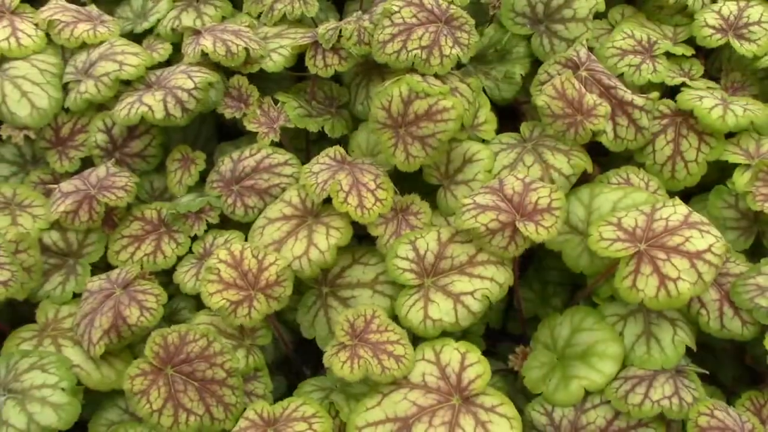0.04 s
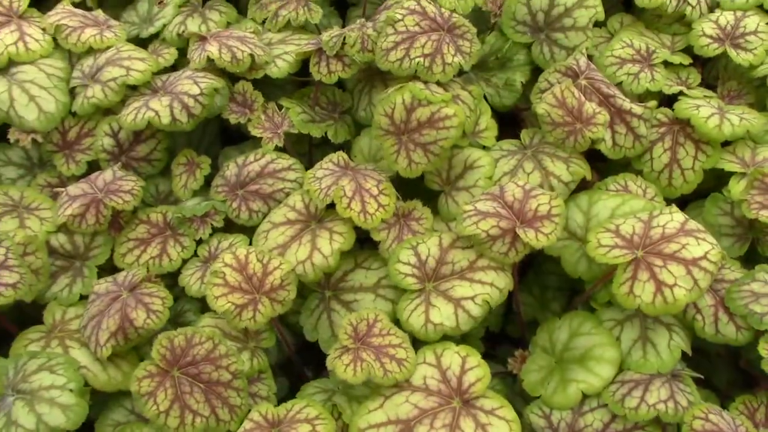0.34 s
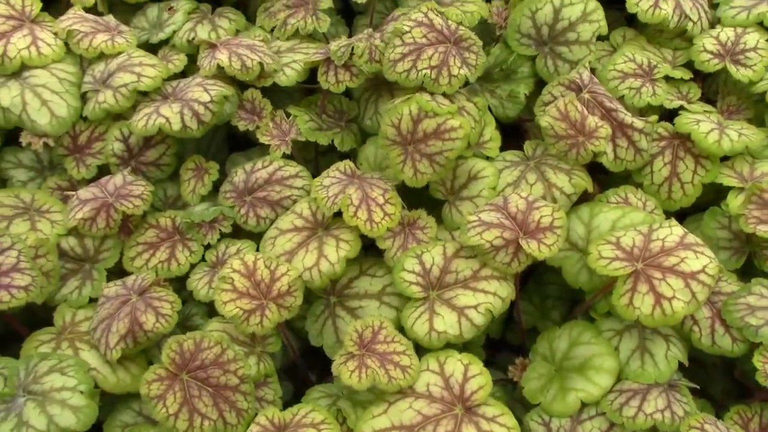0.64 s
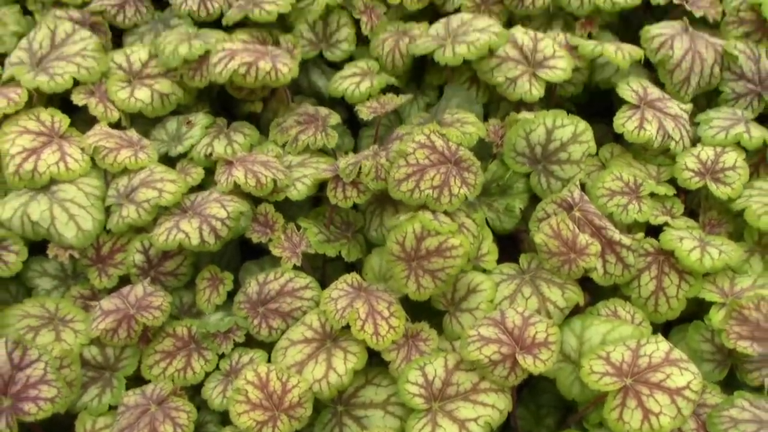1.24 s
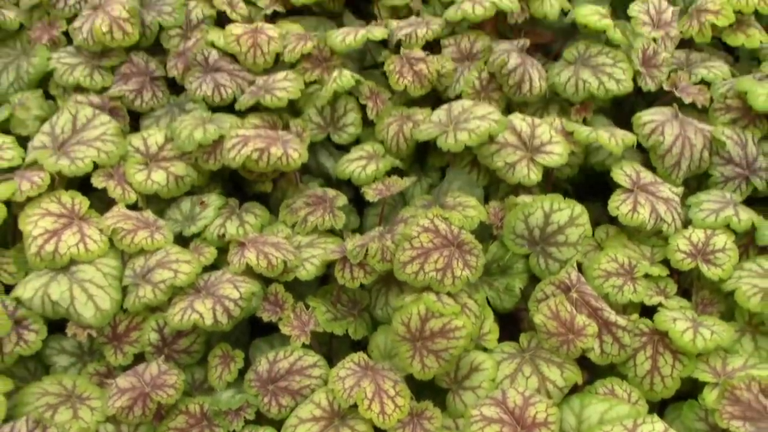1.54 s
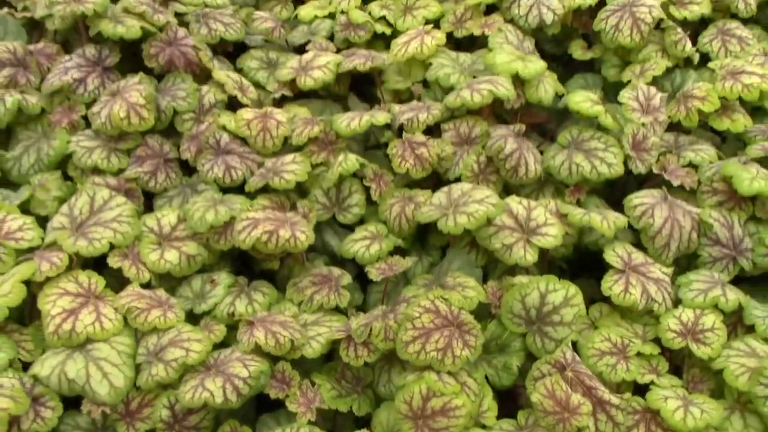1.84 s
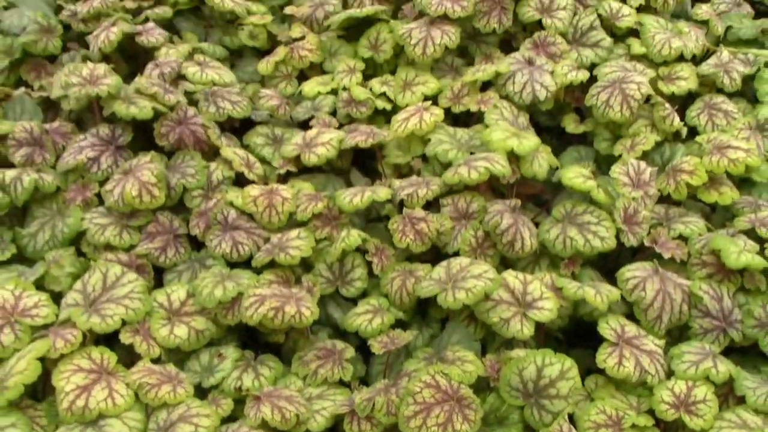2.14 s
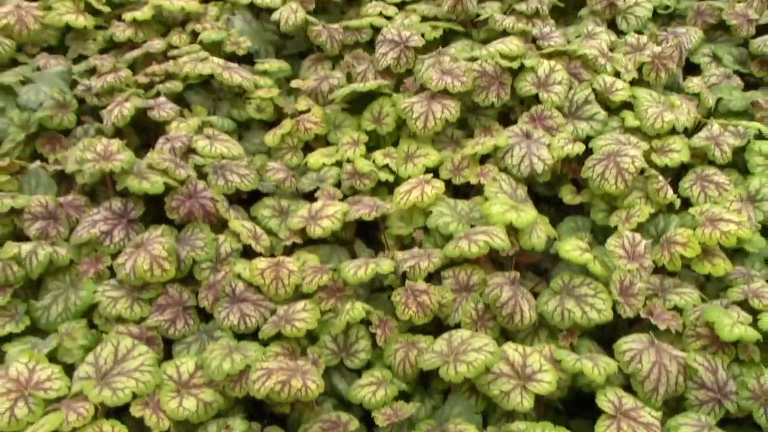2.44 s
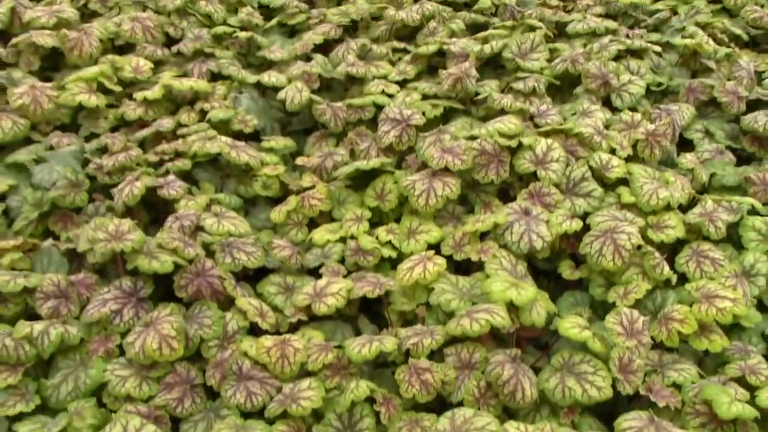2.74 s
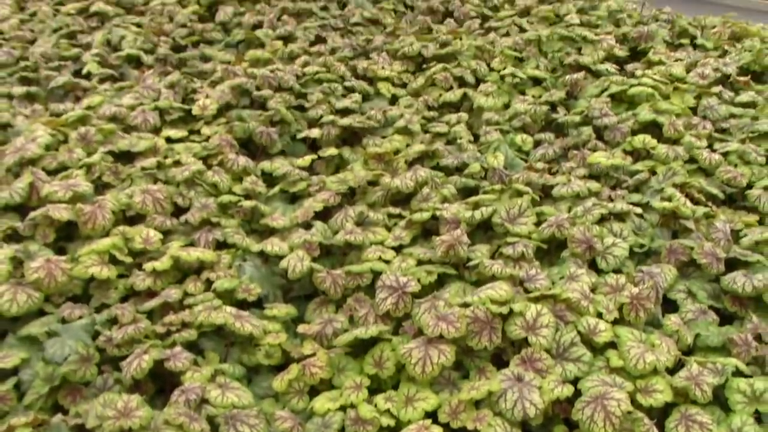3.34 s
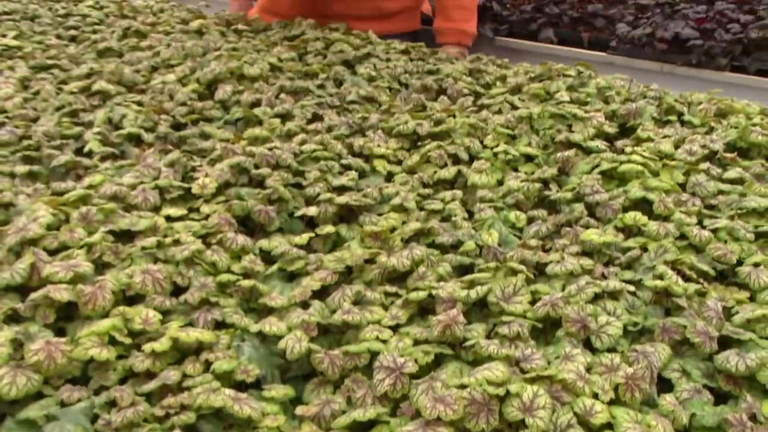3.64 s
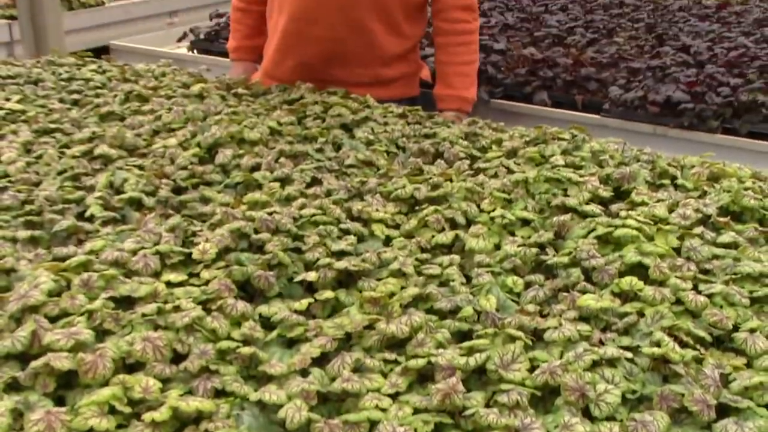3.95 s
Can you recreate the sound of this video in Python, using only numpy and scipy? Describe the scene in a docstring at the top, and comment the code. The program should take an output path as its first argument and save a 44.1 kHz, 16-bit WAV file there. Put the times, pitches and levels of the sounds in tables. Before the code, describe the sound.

A steady rush of air from humming fans fills a large indoor plant nursery. Faint knocks, a scuff and two ticks come first, then the hiss brightens slightly and a low gust briefly hits the microphone.

```python
"""A steady rush of air fills a large greenhouse, carrying motor hum and the tones of unequal fans.
The hiss brightens as the microphone tilts up from the plants. Two soft knocks, a scuff and two
small ticks pass in the first two seconds. Very low air buffets shake the microphone throughout,
and near the end one gust briefly overloads it."""
import sys
import numpy as np
from scipy import signal
from scipy.fft import rfft, irfft
from scipy.io import wavfile
from scipy.ndimage import uniform_filter1d

SR = 44100
rng = np.random.default_rng(int(sys.argv[2]) if len(sys.argv) > 2 else 0)


def unload_audio(sound):
    """Save the sound as a 16-bit wav file, at the path given as the first command line argument."""
    columns = np.transpose(np.atleast_2d(sound))
    # keep every value between -1 and 1, then stretch to whole-number steps
    steps = np.round(np.clip(columns, -1, 1) * 32767)
    wavfile.write(sys.argv[1], SR, steps.astype(np.int16))


N = 176400
T = np.arange(N) / SR


def amp(db):
    """Decibels to gain."""
    return 10 ** (np.asarray(db) / 20)


def unit(x):
    """Scales to rms 1."""
    return x / np.sqrt(np.mean(x ** 2) + 1e-20)


def at_hz(points, hz):
    """Reads an EQ curve on a log-frequency axis."""
    f, value = np.transpose(points)
    return np.interp(np.log(hz + 1), np.log(f + 1), value)


def at_time(points, t):
    """Reads an automation curve."""
    return np.interp(t, *np.transpose(points))


def noise(colour):
    """Steady noise of rms 1, shaped by an EQ curve."""
    gain = amp(at_hz(colour, np.fft.rfftfreq(N, 1 / SR)))
    return unit(irfft(rfft(rng.standard_normal(N)) * gain, N))


def wander(rate_hz):
    """Slow random motion up to about the given rate."""
    f = np.fft.rfftfreq(N, 1 / SR)
    lowpass = np.exp(-(f / rate_hz) ** 2) * (f > 0)
    return unit(irfft(rfft(rng.standard_normal(N)) * lowpass, N))


def burst(start, rise_s, t60_s):
    """Envelope: linear attack, exponential decay."""
    t = T - start
    return np.clip(t / rise_s, 0, 1) * amp(-60 * np.maximum(t - rise_s, 0) / t60_s)


def tone(hz, waver_db, drift=0):
    """A sine of rms 1 whose level wavers in the hall; its pitch wanders by the fraction drift."""
    turns = np.cumsum(hz * (1 + drift * wander(rate_hz=1.74))) / SR + rng.random()
    return unit(np.sin(2 * np.pi * turns) * amp(waver_db * wander(rate_hz=2.37)))


def distant(hits, colour, rise_s, t60_s):
    """Far-off handling noises, smeared by the hall into decaying bursts."""
    return noise(colour) * sum(amp(db) * burst(start, rise_s, t60_s) for start, db in hits)


def knocks():
    """Soft, distant knocks with a quick attack and a short tail."""
    # Each row: start in seconds, level in dB.
    hits = [(.326, -24.5), (.776, -28)]
    # Dull, midrange body. Each row: frequency in Hz, relative level in dB.
    colour = [(150, -10), (450, -2), (850, 3), (1300, -8.5), (2500, -12), (8000, -36), (15000, -50)]
    return distant(hits, colour, rise_s=0.002, t60_s=0.22)


def scuff():
    """One distant scuff that eases in and trails off in the hall."""
    # Each row: start in seconds, level in dB.
    hits = [(.482, -26)]
    # Raspy upper mids. Each row: frequency in Hz, relative level in dB.
    colour = [(400, -20), (1200, -6), (2200, -2.5), (4000, 2.5), (5500, -7), (8000, -16), (15000, -29)]
    return distant(hits, colour, rise_s=0.028, t60_s=0.5)


def ticks(hold_s=0.0028, snap_t60_s=0.009, ring_t60_s=0.24):
    """Short bright snaps nearby, each ringing on faintly in the treble."""
    # Each row: start in seconds, level in dB, ring level in dB relative to the snap.
    hits = [(1.4, -27.5, -20), (1.6568, -25.5, -12)]
    # EQ of the snap and of its ring. Each row: frequency in Hz, relative level in dB.
    snap_colour = [(1500, -25), (3200, -10), (4000, 9), (5500, -3), (7200, 0), (8400, -8), (9400, 3),
                   (10500, -5), (11400, -2), (12800, -14), (15500, -8.5)]
    ring_colour = [(2000, -22), (4200, -2), (6500, -2), (8300, -6), (9500, 1), (10500, -6), (11400, 2),
                   (12300, -13), (15500, -17)]
    out = np.zeros(N)
    for start, db, ring_db in hits:
        snap = (T >= start) * amp(-60 * np.maximum(T - start - hold_s, 0) / snap_t60_s)
        ring = amp(ring_db) * burst(start, hold_s, ring_t60_s)
        out += amp(db) * (snap * noise(snap_colour) + ring * noise(ring_colour))
    return out


def buffeting(level_db=-14.5, gust_at_s=3.331, gust_width_s=0.092, gust_hz=11.5, gust_db=-1.5):
    """Slow pressure swings at the microphone swell and ebb; one gust takes over for a few swings."""
    # Sub-bass rumble. Each row: frequency in Hz, relative level in dB.
    colour = [(3, -41), (7, -9), (11, -2), (15, -2), (23, -5), (32, -16), (48, -20), (60, -28), (78, -32.5),
              (100, -34), (250, -76)]
    # Its swells. Each row: time in seconds, gain in dB.
    swells = [(0, 2.5), (.22, -4.5), (.4, 2), (.6, -2), (1.0, 3), (1.28, -3), (1.6, 0.5), (1.85, -3.5),
              (2.0, 2.5), (2.6, -3.5), (2.9, 2), (3.6, -2), (4, -2)]
    rumble = amp(level_db + at_time(swells, T)) * noise(colour)
    t = T - gust_at_s
    gust = -amp(gust_db) * np.cos(2 * np.pi * gust_hz * t)
    crossfade = np.exp(-(t / gust_width_s) ** 2)
    return rumble * (1 - crossfade) + gust * crossfade


def motors(mains_hz=60.015, buzz_db=-0.5):
    """Motors hum at twice the mains frequency, under a thin buzz of higher harmonics."""
    # The hum slowly grows. Each row: time in seconds, level in dB.
    hum_level = [(0, -33), (.8, -31), (2, -29), (3.2, -27.5), (4, -27)]
    # The buzz. Each row: multiple of the mains frequency, level in dB relative to buzz_db.
    harmonics = [(4, -44.5), (6, -50.5), (8, -51.5), (10, -49.5), (12, -49.5), (14, -54), (24, -57),
                 (34, -56), (36, -57), (44, -62), (58, -63), (60, -58), (66, -58), (72, -53.5), (73, -55),
                 (74, -61), (78, -58.4), (79, -58), (80, -66), (81, -59)]
    hum = amp(at_time(hum_level, T)) * tone(2 * mains_hz, waver_db=0.47)
    buzz = sum(amp(buzz_db + db) * tone(k * mains_hz, waver_db=3) for k, db in harmonics)
    return hum + buzz


def fan_blades(level_db=-1):
    """Blade tones of fans that turn at slightly different speeds."""
    # Each row: pitch in Hz, level in dB relative to level_db.
    blade_tones = [(135.4, -36), (145.9, -46), (162.5, -44.3), (189.6, -43.5), (206.9, -51), (230.0, -47.5),
                   (243.8, -43.5), (487.5, -47), (647.2, -47.5), (649.9, -48), (677.0, -47), (731.3, -56),
                   (866.5, -60.5), (893.6, -50), (1543.5, -57.5), (1787.1, -61)]
    return sum(amp(level_db + db) * tone(hz, waver_db=2, drift=0.00099) for hz, db in blade_tones)


def air_rush(level_db=-26.5, patch_db=0.84, flutter_db=0.24):
    """Turbulent air from the fans, faintly patchy, brighter as the microphone tilts up."""
    # Full lows under a soft hiss. Each row: frequency in Hz, relative level in dB.
    colour = [(30, -5), (70, 3), (110, -2.5), (150, -2.5), (180, -2.5), (222, 2.5),
              (255, -2.5)] + [(160, -35), (280, -4), (343, -6), (405, -4), (557, -1.5), (659, -1.5),
              (729, -5), (767, -9), (863, -9), (970, -12), (1450, -16.5), (1960, -11), (2440, -14),
              (2840, -10.5), (3850, -10.5), (7040, -22), (14000, -34), (15500, -42)][1:]
    # Level ride as the microphone turns. Each row: time in seconds, gain in dB.
    ride = [(0, -1.34), (1.0, -0.7), (2.0, -0.75), (2.6, .4), (4, .5)]
    # The microphone's angle. Each row: time in seconds, amount of upward tilt (0 is halfway).
    tilt = [(0, -0.56), (.7, -0.33), (1.1, -0.66), (1.6, -0.3), (2.1, 0.084), (2.6, 0.024), (3.1, 0.37),
            (3.5, 0.88), (4, 0.56)]
    # EQ at a tilt of 1. Each row: frequency in Hz, gain in dB.
    tilt_eq = [(100, -0.5), (290, -2), (410, 2), (620, 0.7), (900, 0), (1400, 4), (2000, 2), (2900, -0.8),
               (3600, 1.2), (4600, -1), (6800, 4.5), (9500, 4.5), (14000, 0.5)]
    frames = dict(nperseg=2048, noverlap=1536)
    hz, t, spectrum = signal.stft(noise(colour), SR, **frames)
    # Random patches of gain, smoothed across frequency, then time.
    patches = uniform_filter1d(rng.standard_normal(spectrum.shape), size=24, axis=0)
    patches = unit(uniform_filter1d(patches, size=10, axis=1))
    moving_eq_db = at_hz(tilt_eq, hz)[:, None] * at_time(tilt, t) + patch_db * patches
    air = signal.istft(spectrum * amp(moving_eq_db), **frames)[1][:N]
    return air * amp(level_db + at_time(ride, T) + flutter_db * wander(rate_hz=6))


def scene():
    """Fans, draught and small noises, mixed in mono at one microphone."""
    bed = air_rush() + fan_blades() + motors() + buffeting()
    return (bed + knocks() + scuff() + ticks())[None]


def record(dry):
    """Soft overload squeezes the hiss on the largest pressure swings; a low-pass trims the top."""
    ceiling, knee_hardness, cutoff_hz = 0.8, 4.3, 15800
    squeezed = dry / (1 + abs(dry / ceiling) ** knee_hardness) ** (1 / knee_hardness)
    lowpass = signal.firwin(1023, cutoff_hz, window=("kaiser", 10), fs=SR)
    return signal.oaconvolve(squeezed, lowpass[None], "same")


dry = scene()
out = record(dry)
unload_audio(out)
```